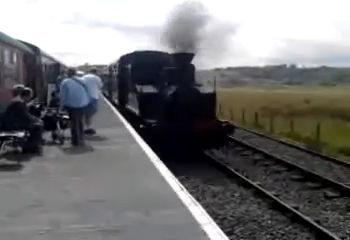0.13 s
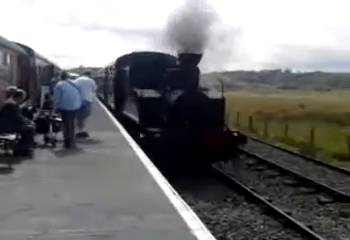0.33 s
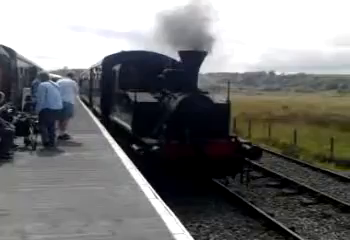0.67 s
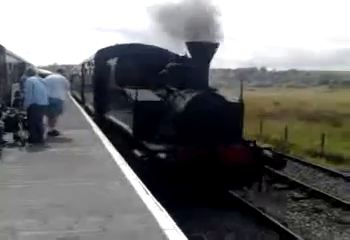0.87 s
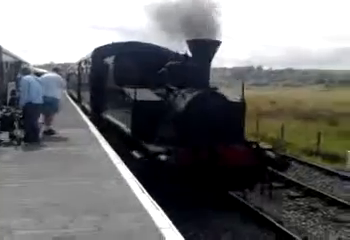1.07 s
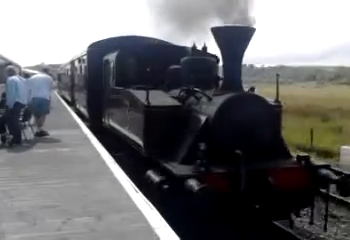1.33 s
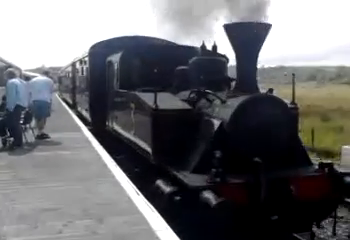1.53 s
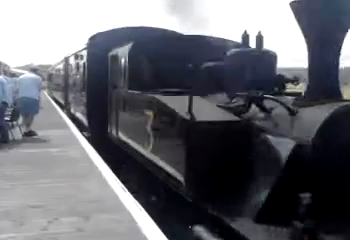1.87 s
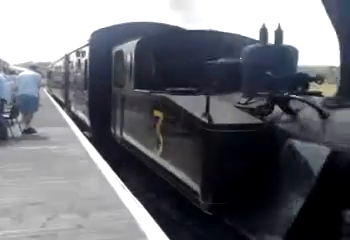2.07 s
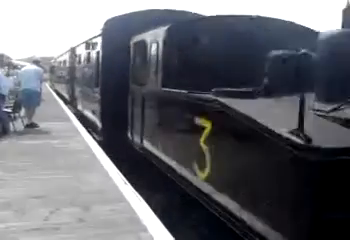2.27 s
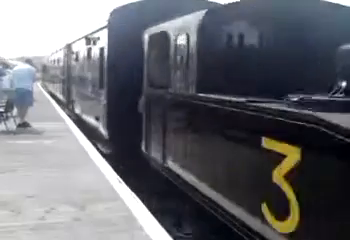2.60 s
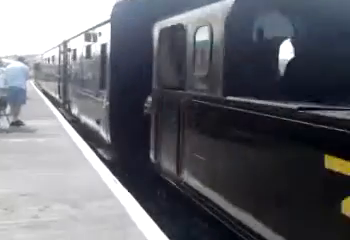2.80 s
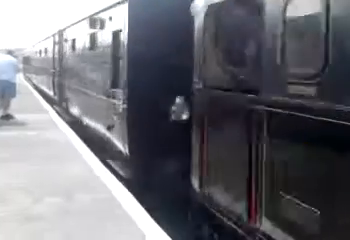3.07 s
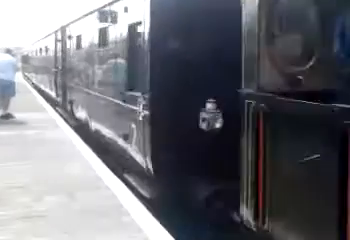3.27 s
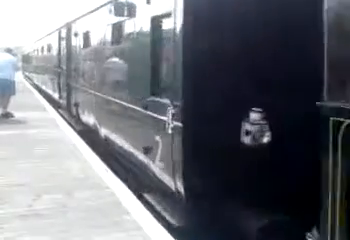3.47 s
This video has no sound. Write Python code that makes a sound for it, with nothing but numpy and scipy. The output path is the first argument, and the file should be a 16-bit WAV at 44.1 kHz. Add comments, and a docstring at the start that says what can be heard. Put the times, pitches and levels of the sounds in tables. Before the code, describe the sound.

A steam locomotive nears along an outdoor platform, with fluttering hiss and faint low rumble from the start. Soft, low, slightly sagging chuffs come about seven a second, with gaps, strongest around 1.7-2.5 seconds, then sparser. Faint scrapes show near 0.2 and 1 second. From 2.5 the louder, brighter steam rings in surges; half-pitched metal squeals sound at 3.3 and 3.5. The small microphone is dull.

```python
"""A small steam tank engine rolls along a station platform towards a small, dull microphone.
From the start, filtered noise makes its leaking steam and rumbling wheels; the hiss grows and brightens as it nears.
Exhaust beats, often about seven a second, blow short sagging sine notes in the chimney, each over a gust of noise.
Brief squeals of resonant noise cut in early, around one second and near the end.
From about two and a half seconds, as the engine draws level, the steam also rings in narrow bands, in surges."""
import sys
import numpy as np
from scipy import signal
from scipy.fft import rfft, irfft, next_fast_len
from scipy.io import wavfile
from scipy.ndimage import uniform_filter1d

SR = 44100
rng = np.random.default_rng(int(sys.argv[2]) if len(sys.argv) > 2 else 0)


def materialize(psi):
    """Save the field psi as 16-bit PCM at rate SR to the path in sys.argv[1].

    A 1-D psi becomes a single channel; in a 2-D psi each row is a channel.
    """
    bounded = np.clip(np.atleast_2d(psi).T, -1, 1)
    quanta = np.round(bounded * 32767).astype(np.int16)
    wavfile.write(sys.argv[1], SR, quanta)


N = 160083
TIME = np.arange(N) / SR


def from_db(db):
    """Decibels to amplitude gain."""
    return 10 ** (np.asarray(db) / 20)


def rms_one(x):
    """Scale to unit power."""
    return x / np.sqrt(np.mean(x ** 2) + 1e-20)


def in_time(rows):
    """A curve joined by straight lines, at every sample."""
    return np.interp(TIME, *np.transpose(rows))


def at_hz(points, hz, column=1):
    """One column of a spectrum, read on a log-frequency axis."""
    table = np.array(points)
    return np.interp(np.log(hz + 1e-9), np.log(table[:, 0]), table[:, column])


def drift(rate_hz):
    """Slow random wander with spread 1: noise through two equal low-pass poles."""
    step = 40  # samples between the slow values
    pole = np.exp(-2 * np.pi * rate_hz * step / SR)
    settle = 2000  # slow values dropped while the filter settles
    noise = rng.standard_normal(N // step + 2 + settle)
    slow = signal.lfilter([1], [1, -2 * pole, pole * pole], noise)[settle:]
    return np.interp(np.arange(N) / step, np.arange(len(slow)), rms_one(slow))


def coloured(spectrum):
    """Steady noise with the given spectrum, unit power."""
    size = next_fast_len(N)
    hz = np.arange(size // 2 + 1) * SR / size
    white = rfft(rng.standard_normal(size))
    return rms_one(irfft(white * from_db(at_hz(spectrum, hz)), size)[:N])


def whistle(hz, width_hz):
    """Turbulence through two equal narrow resonances, its slow swings of level evened out."""
    r = np.exp(-2 * np.pi * width_hz / SR)
    section = [1 - r, 0, r - 1, 1, -2 * r * np.cos(2 * np.pi * hz / SR), r * r]
    x = rms_one(signal.sosfilt([section, section], rng.standard_normal(N)))
    local_power = uniform_filter1d(x ** 2, size=2200)  # over 50 ms
    return x / np.sqrt(local_power + 1e-6)


def beat(t, attack_s, decay_s):
    """A rounded swell up to t = 0 and a rounded fall after it."""
    return np.exp(-(t / np.where(t < 0, attack_s, decay_s)) ** 2)


def swell(s, spread_s):
    """A smooth bell-shaped rise and fall round one moment."""
    return np.exp(-.5 * ((TIME - s) / spread_s) ** 2)


# level of the hiss as the engine comes up the platform: time_s, level_db (flutter is added)
STEAM_LEVEL = [(0, -24), (.16, -26.5), (.39, -23), (.5, -26), (.71, -24.5), (.78, -23.5), (1.0, -20.5),
               (1.06, -23), (1.16, -21.5), (1.23, -20), (1.78, -19.5), (1.85, -21), (1.93, -19),
               (2.14, -18), (2.35, -19), (2.43, -15.5), (2.65, -18), (2.83, -17.5), (2.97, -16.5),
               (3.05, -18), (3.13, -16.5), (3.22, -20), (3.28, -16.5), (3.42, -18.5), (3.52, -18),
               (3.63, -14)]
# relative colour of the hiss at three distances: pitch_hz, far_off_db, approaching_db, alongside_db (per Hz)
STEAM_COLOUR = [(405, -29.5, -28.5, -23.5), (746, -21, -14, -20), (944, -11, -7.5, -12.5),
                (1125, -12, -2.5, -2), (1430, -7.5, 0.5, -3), (1670, -4, 8.5, -2.5), (1670, -5.5, 2, -2),
                (2000, 1.5, 4.5, 0), (2500, -4, 1.5, 3), (2775, -3.5, -1.5, 1), (2740, -11.5, -4, -2),
                (3262, -6, -6.5, 0), (3603, -22, -23, -13.5), (4260, -41, -40, -33.5),
                (4360, -51, -54.5, -46)]
FAR_S, APPROACHING_S, ALONGSIDE_S = 0.22, 1.28, 3.52
FLUTTER_DB, FLUTTER_HZ = 0.5, 50  # the whole hiss together
PATCHY_DB, PATCHY_HZ = 3.68, 32   # each band on its own


def steam():
    """Leaking steam is turbulent noise, fluttering as a whole and band by band as its colour changes."""
    edges = np.arange(300, 4700, 100)  # Hz
    lead_in = SR // 10  # samples for the filters to settle
    white = rng.standard_normal((2, N + lead_in))  # neighbouring bands take turns
    hiss, power = 0, 0
    for k, (low, high) in enumerate(zip(edges, edges[1:])):
        middle = (low + high) / 2
        colours_db = [at_hz(STEAM_COLOUR, middle, column) for column in (1, 2, 3)]
        gain = from_db(np.interp(TIME, [FAR_S, APPROACHING_S, ALONGSIDE_S], colours_db))
        band_filter = signal.butter(3, [low, high], "band", fs=SR, output="sos")
        band = signal.sosfilt(band_filter, white[k % 2])[-N:]
        patchy = rms_one(band * from_db(PATCHY_DB * drift(PATCHY_HZ)))
        hiss = hiss + gain * patchy
        power = power + gain ** 2
    level_db = in_time(STEAM_LEVEL) + FLUTTER_DB * drift(FLUTTER_HZ)
    return hiss / np.sqrt(power) * from_db(level_db)


BOUNCE_S, BOUNCE_DB = 0.002074, -10  # mean delay and level
BOUNCE_WANDER_S, BOUNCE_WANDER_HZ = 0.0004, 1.2


def off_platform(x):
    """Direct sound plus one reflection off the platform; its wandering delay hollows out shifting bands."""
    delay_s = BOUNCE_S + BOUNCE_WANDER_S * drift(BOUNCE_WANDER_HZ)
    gain = from_db(BOUNCE_DB)
    bounce = gain * np.interp(TIME - delay_s, TIME, x, left=0)
    return (x + bounce) / np.sqrt(1 + gain ** 2)


# level of the wheels on the rails: time_s, level_db (a random wander is added)
RAIL_LEVEL = [(0, -38.5), (.7, -40.5), (1.6, -37.5), (2.3, -35.5), (2.85, -32), (3.15, -32), (3.63, -31.5)]
# relative colour of that rumble: pitch_hz, level_db (per Hz)
RAIL_COLOUR = [(20, -24), (40, -13), (70, -1.5), (130, -0.5), (250, 1.5), (450, -0.5), (800, 1),
               (1300, -3.5), (2500, -25)]


def rumble():
    """Wheels rolling on the rails: low noise of unsteady level, louder in the second half."""
    level_db = in_time(RAIL_LEVEL) + 1.7 * drift(17)
    return coloured(RAIL_COLOUR) * from_db(level_db)


# exhaust beats at the chimney: peak_s, level_db (before NOTE_DB), pitch_hz (at the peak), swell_s
EXHAUST_BEATS = [(0.03, -34, 256, 0.017), (0.134, -27, 267, 0.0093), (.253, -26, 256.6, 0.019),
                 (.386, -28.5, 251, 0.018), (0.64, -31, 251, 0.021), (.752, -37.5, 250, 0.025),
                 (0.905, -33, 245, 0.022), (1.159, -27.5, 249, 0.02), (1.284, -26.5, 264, 0.01),
                 (1.415, -26, 272, 0.0085), (1.553, -27, 280.4, 0.023), (1.670, -18.5, 261, 0.012),
                 (1.800, -21, 269.4, 0.011), (1.945, -18.5, 265.3, 0.014), (2.09, -22, 256, 0.013),
                 (2.229, -16.5, 248.6, .016), (2.366, -17, 253.6, 0.016), (2.512, -20, 252.4, 0.0087),
                 (2.672, -36, 251, 0.03), (2.81, -22, 251, 0.014), (2.946, -32, 258, 0.009),
                 (3.42, -25.5, 257, 0.0097)]
NOTE_DB, NOTE_ROUGH = 2, 0.21
TAIL_PER_SWELL, SAG_HZ_PER_S = 1.15, 360
ECHO_S, ECHO_DB = 0.031, -10
# relative colour of the gust of steam under each note: pitch_hz, level_db (per Hz)
GUST_COLOUR = [(25, -31), (60, -5), (110, 1), (200, 2.5), (330, 2.5), (500, -7), (900, -27.5)]
GUST_DB, GUST_FOLLOWS = -26, 0.42  # base level; dB of gust per dB of beat
GUST_ATTACK_S, GUST_DECAY_S = 0.02, 0.04


def chimney():
    """Each beat blows a sagging note over a low gust; the note returns once from the standing carriages."""
    note, gust = np.zeros(N), np.zeros(N)
    for s, db, hz, swell_s in EXHAUST_BEATS:
        t = TIME - s
        cycles = hz * t - SAG_HZ_PER_S * t ** 2 / 2 + rng.random()
        shape = beat(t, swell_s, TAIL_PER_SWELL * swell_s)
        note += from_db(db + NOTE_DB) * shape * np.sin(2 * np.pi * cycles)
        gust += from_db(GUST_DB + GUST_FOLLOWS * db) * beat(t, GUST_ATTACK_S, GUST_DECAY_S)
    note = note * (1 + NOTE_ROUGH * drift(73))
    echo = from_db(ECHO_DB) * np.interp(TIME - ECHO_S, TIME, note, left=0)
    return note + echo + gust * coloured(GUST_COLOUR)


# half-pitched scrapes and squeals: peak_s, spread_s, pitch_hz, width_hz (each resonance), level_db
SCRAPES = [(.23, 0.038, 2080, 46, -25), (1.002, 0.01, 2160, 49, -21), (3.275, 0.02, 2350, 17, -15),
           (3.321, 0.044, 1180, 78, -22), (3.523, 0.042, 1478, 36, -14), (3.57, 0.066, 1630, 44, -23)]


def squeals():
    """Steel scraping on steel: brief noise through narrow resonances, so only half pitched."""
    total = 0
    for s, spread_s, hz, width_hz, db in SCRAPES:
        total = total + from_db(db) * swell(s, spread_s) * whistle(hz, width_hz)
    return total


# bands in which the steam rings as the cylinders pass: pitch_hz, width_hz (each resonance), relative level_db
RING_BANDS = [(1189, 46, -6), (1906, 56, 2.5), (2625, 70, 3), (3093, 50, -8.5), (3316, 81, -4)]
# surges of that ringing, close to the microphone: peak_s, spread_s, level_db (added to each band's)
RING_SURGES = [(2.507, 0.063, -27.5), (2.686, 0.071, -27), (2.825, 0.032, -23), (2.956, 0.052, -19),
               (3.13, 0.024, -25.5)]


def ringing_steam():
    """Close by, the jet rings in a few fixed narrow bands, which surge together."""
    strength = sum(from_db(db) * swell(s, spread_s) for s, spread_s, db in RING_SURGES)
    ringing = sum(from_db(db) * whistle(hz, width_hz) for hz, width_hz, db in RING_BANDS)
    return strength * ringing


def scene():
    """The whole engine at the platform, in one channel."""
    train = off_platform(steam()) + rumble() + chimney() + squeals() + ringing_steam()
    return train[None]


CUTOFF_HZ = 4750  # 60 dB down from here up


def record(dry):
    """The small, dull microphone and its recorder cut off the treble steeply."""
    treble_cut = signal.cheby2(16, 60, CUTOFF_HZ, fs=SR, output="sos")
    return signal.sosfilt(treble_cut, dry)


dry = scene()
out = record(dry)
materialize(out)
```